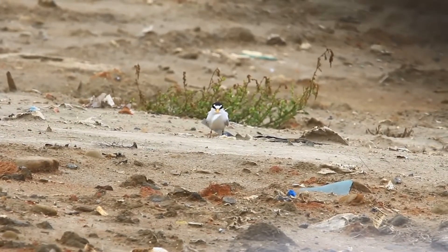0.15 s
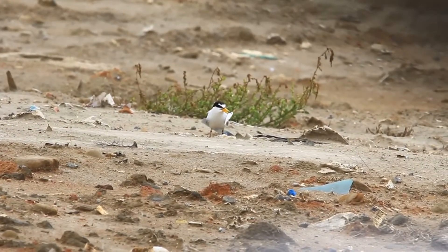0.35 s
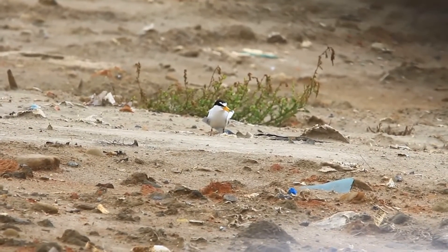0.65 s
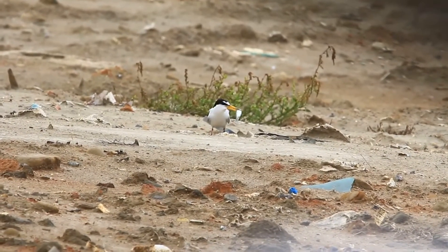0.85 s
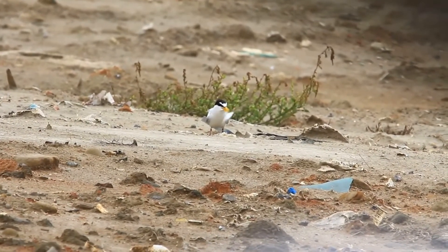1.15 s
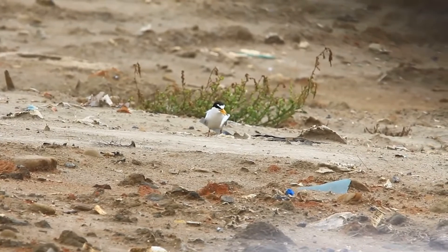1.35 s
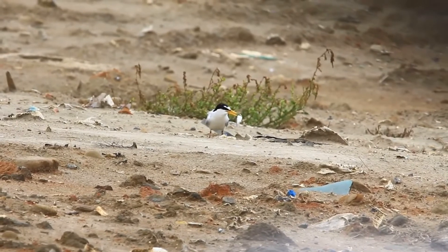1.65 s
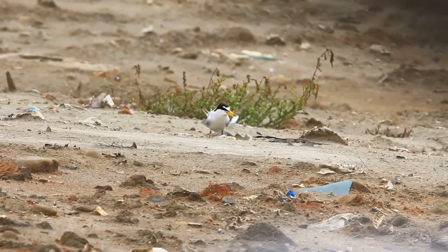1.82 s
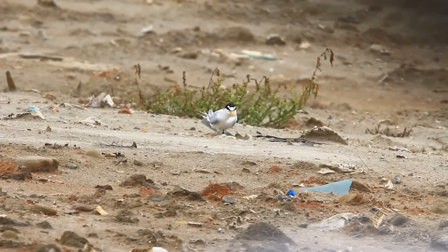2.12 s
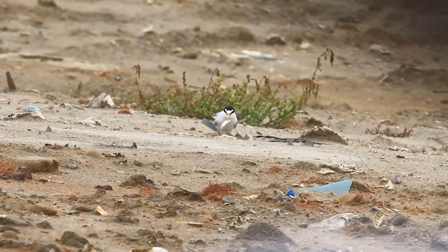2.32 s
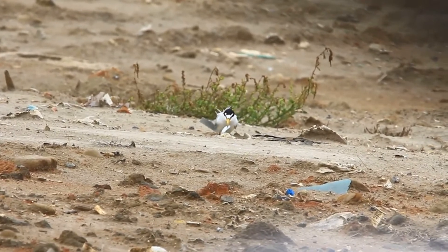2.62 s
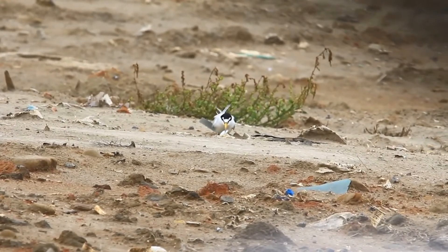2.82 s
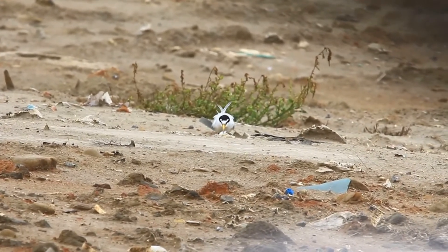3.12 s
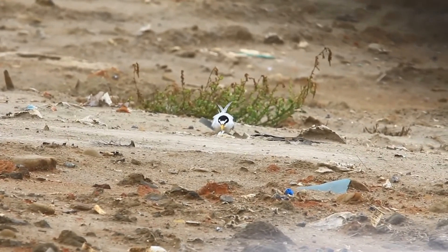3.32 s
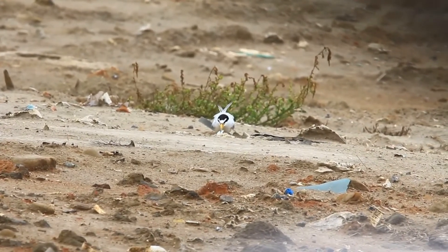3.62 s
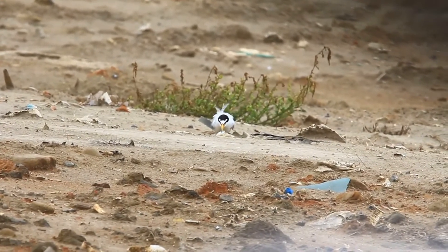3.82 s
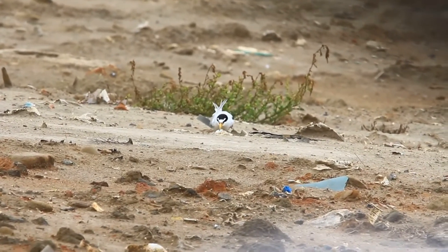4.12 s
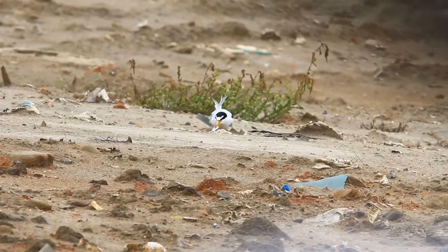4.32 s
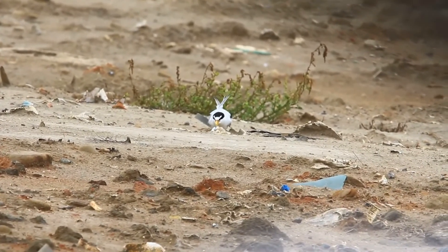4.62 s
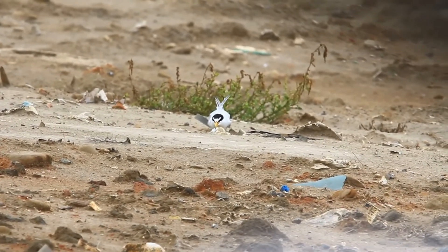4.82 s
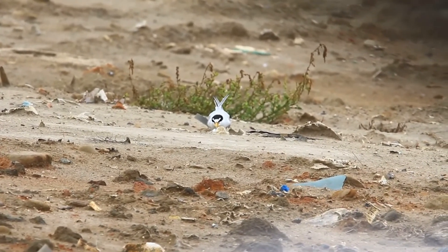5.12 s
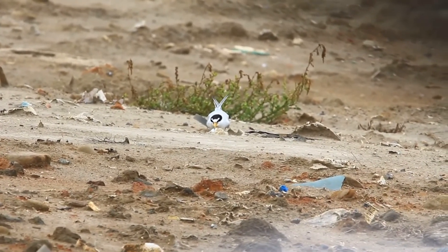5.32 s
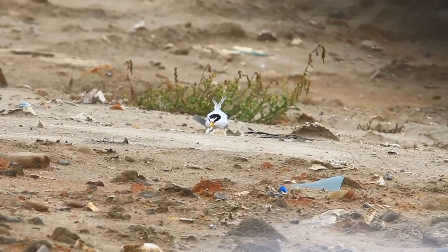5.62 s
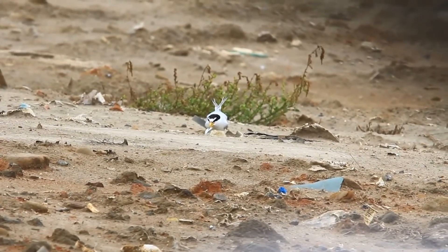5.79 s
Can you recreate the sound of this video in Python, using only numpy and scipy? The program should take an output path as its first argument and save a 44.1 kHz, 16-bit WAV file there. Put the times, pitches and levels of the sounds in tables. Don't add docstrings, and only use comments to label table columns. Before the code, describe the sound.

On an open shore, small seabirds near a stereo microphone utter quick, squeaky, scratchy calls, each barely a tenth of a second, nearly centred and dry. Far-off waders peep weakly over low surf hiss, distant drone and light wind rumble. The calls thin and sink away after about three seconds, then after a near-silent dip, softer single whistled calls appear well apart.

```python
import sys
import numpy as np
from scipy import signal
from scipy.io import wavfile

SR = 44100
rng = np.random.default_rng(int(sys.argv[2]) if len(sys.argv) > 2 else 0)


def makeup_ratio(level_db):
    decades = np.asarray(level_db, float) / 20
    return 10 ** decades


def wav_out(sig):
    wavfile.write(sys.argv[1], SR, np.round(np.clip(np.atleast_2d(sig).T, -1, 1) * 32767).astype(np.int16))


N = 262395
T = np.arange(N) / SR
CUT_S = 4.162


def by_scene(first, second):
    return np.where(T < CUT_S, first, second)


def in_time(rows, t):
    s, *columns = np.transpose(rows)
    return [np.interp(t, s, c) for c in columns]


def at_hz(points, hz):
    point_hz, value = np.transpose(points)
    return np.interp(np.log(hz), np.log(point_hz), value)


def rms_one(x):
    return x / np.sqrt(np.mean(x ** 2) + 1e-20)


def band(x, low_hz, high_hz, order):
    return signal.sosfilt(signal.butter(order, [low_hz, high_hz], "band", fs=SR, output="sos"), x + 1e-18)


def drift(rate_hz, size=N):
    r = np.exp(-2 * np.pi * rate_hz / SR)
    run_in = int(SR / rate_hz)
    white = rng.standard_normal(size + run_in)
    return rms_one(signal.lfilter([1], [1, -2 * r, r * r], white)[run_in:])


def turns(hz):
    return 2 * np.pi * np.cumsum(hz) / SR


def wobbly(phase, rough, rate_hz):
    rough = np.clip(rough, 0, 1)
    swell = makeup_ratio(2.5 * rough * np.clip(drift(rate_hz, size=len(phase)), -3, 1))
    return np.sqrt(2) * swell * np.cos(phase + 1.8 * rough * drift(rate_hz, size=len(phase)))


def lines_sum(sines, gains):
    return sum(s * g for s, g in zip(sines, gains)) / np.sqrt(sum(g ** 2 for g in gains))


def banded_noise(spectra, low_hz, count, patchy_db):
    # (frequency [Hz], likeness [0-1])
    likeness = [(25, 0.94), (60, .9), (150, .76), (400, 0.85), (700, .85), (1100, .99), (2400, 1),
                (6000, 0.96), (15000, .87)]
    out = [0] * len(spectra)
    edges = low_hz * 2 ** (np.arange(count + 1) / 3)
    white = rng.standard_normal((2, 2, N))
    together = drift(0.95)
    for k, (low, high) in enumerate(zip(edges, edges[1:])):
        sos = signal.butter(3, [low, high], "band", fs=SR, output="sos")
        mid, side = signal.sosfilt(sos, white[k % 2])
        hz = np.sqrt(low * high)
        alike = np.clip(at_hz(likeness, hz), -1, 1)
        part = np.sqrt(1 + alike) * mid + np.sqrt(1 - alike) * side * [[1], [-1]]
        part = part * makeup_ratio(patchy_db * (.5 * together + drift(4.1)))
        out = [o + makeup_ratio(at_hz(s, hz)) * part for o, s in zip(out, spectra)]
    return [rms_one(o) for o in out]


def motor_whine():
    whine_hz, whine_db = 3200, -12.5
    whine = wobbly(turns(np.full(N, whine_hz)), 0.62, rate_hz=6.04)
    quarter = np.sin(turns(np.full(N, whine_hz / 4)))
    return makeup_ratio(whine_db - by_scene(0, 4)) * whine + makeup_ratio(whine_db - 9) * quarter * by_scene(0, 1)


def surf():
    # (frequency [Hz], density [dB per Hz])
    surf_spectra = [
        [(470, -58), (800, -33), (1280, -2.5), (2270, -2.5), (2440, 1), (2980, -5.5), (3210, 1), (3500, -3.5),
         (4320, -8), (6270, -22.5), (9790, -32), (11900, -26.5), (15500, -35.5)],
        [(470, -39), (800, -13), (894, -15.5), (1330, 1), (1730, -1.5), (1950, 10.5), (2270, -3.5), (2440, -6),
         (3330, -1.5), (5530, -17.5), (7640, -19.5), (14700, -16), (15500, -21)],
    ]
    first, second = banded_noise(surf_spectra, 796.6, count=13, patchy_db=1.1)
    return makeup_ratio(by_scene(-40.5, -64)) * (by_scene(first, second) + motor_whine())


def drone():
    # (frequency [Hz], density [dB per Hz])
    drone_spectrum = [(230, -5), (450, -4.5), (900, -5.5)]
    eased_sag_db_per_s = 1.1
    level_db = by_scene(-76, -80.5) + eased_sag_db_per_s * T * by_scene(1, 0)
    return makeup_ratio(level_db) * banded_noise([drone_spectrum], 230, count=6, patchy_db=1.0)[0]


def wind():
    # (frequency [Hz], density [dB per Hz])
    wind_spectrum = [(12, -30), (20, 10.5), (39, -7), (167, -19.5), (226, -21.5), (260, -22), (340, -49),
                     (570, -120)]
    # (time [s], extra wind [dB])
    gust_rows = [(0, 6), (.32, 7.5), (.47, 8), (.9, 4), (1.15, 4), (1.6, 7.5), (2.3, 9.5), (2.8, 9.5),
                 (3.0, 5), (3.35, 9.5), (3.6, 9.5), (3.9, 10.5), (4.4, 12), (5.3, 6.5)]
    gust_s = .11
    level_db = by_scene(-68, -72) + sum(db * np.exp(-((T - s) / gust_s) ** 2) for s, db in gust_rows)
    lumps = makeup_ratio(2.6 * drift(35))
    return makeup_ratio(level_db) * lumps * banded_noise([wind_spectrum], 20, count=11, patchy_db=1.5)[0]


def sing(tables, voice, level_axis, edge_s):
    out = np.zeros(N + SR)
    for rows in tables:
        start, end = int((rows[0][0] - edge_s) * SR), int((rows[-1][0] + edge_s) * SR)
        t = np.arange(start, end) / SR
        controls = in_time(rows, t)
        level_db = controls.pop(level_axis)
        edge = np.clip(np.minimum(t - t[0], t[-1] - t) / (2 * edge_s), 0, 1)
        out[start:end] += voice(*controls) * makeup_ratio(level_db) * edge
    return out[:N]


def quick_rise(opened, broken, end, top_hz, db):
    opening_s, voiced_share = .0205, .38
    start_hz, climb_hz, bow_hz = 677, 301.5, 28
    start_db, voiced_db, open_db, climbed_db = -20, -13.5, -3.5, -1
    start, open_hz = opened - opening_s, top_hz - climb_hz
    voiced_hz = start_hz + voiced_share * (open_hz - start_hz)
    return [(start, start_hz, db + start_db),
            (start + voiced_share * opening_s, voiced_hz, db + voiced_db),
            (opened, open_hz, db + open_db),
            ((opened + broken) / 2, (open_hz + top_hz) / 2 + bow_hz, db + (open_db + climbed_db) / 2),
            (broken + .001, top_hz, db + climbed_db)]


def rise(hz, half_db=-60):
    # (frequency [Hz], gain [dB])
    throat_band = [(700, -48.5), (1100, -15.5), (1400, -10), (2200, -7.5), (3200, 3), (4200, 3),
                   (5500, -12.5), (6700, -29), (7400, -63.5), (9000, -69.5)]
    ring_hz, ring_width_hz = 3500, 900
    orders = np.arange(1, 33) / 2
    closed = np.clip(1 - hz / 1500, 0, 1)
    narrow = 1 + .9 * closed
    throat = [makeup_ratio(narrow * at_hz(throat_band, k * hz)) for k in orders]
    gains = [makeup_ratio(half_db) * g ** 4 if k % 1 else g for k, g in zip(orders, throat)]
    phase = turns(hz * (1 + 0.006 * drift(140, size=len(hz))))
    lags = [2.0 * np.arctan((k * hz - ring_hz) / ring_width_hz) for k in orders]
    sines = [wobbly(k * phase - lag, .08 + .17 * closed, rate_hz=250) for k, lag in zip(orders, lags)]
    return lines_sum(sines, gains)


def rasp_end(opened, entry, end, top_hz, db):
    entry_hz, held_hz, peak_hz, end_hz = 1971, 2117, 2227, 1710
    entry_db, held_db, peak_db, end_db = db - 1.5, db + 0.5, db + 2, db - 17.5
    entry_rough, held_rough, end_rough = .75, .47, .9
    high_hz, high_db = top_hz + 1778, 0.5
    high_end_hz = high_hz - 114
    settled, peak = entry + .008, entry + .6 * (end - entry)
    rows = [(entry, entry_hz, 2 * top_hz, entry_db, high_db, entry_rough),
            (settled, held_hz, high_hz, held_db, high_db, held_rough),
            ((settled + peak) / 2, held_hz, high_hz, held_db, high_db, held_rough),
            (peak, peak_hz, high_hz, peak_db, high_db - 1, held_rough),
            (end - .011, held_hz, high_end_hz, held_db, high_db, held_rough),
            (end, end_hz, high_end_hz, end_db, high_db, end_rough)]
    wander = [0, 35, 100, 0, 3, 0]
    return rows + rng.standard_normal(np.shape(rows)) * wander


def hoarse(size, low_hz, high_hz):
    return rms_one(band(rng.standard_normal(size), low_hz, high_hz, order=2))


def rasp(low_hz, high_hz, high_db, rough):
    # (multiple of low voice, multiple of high voice, level [dB])
    mixing_lines = [(1, 0, -7), (2, 0, 3), (3, 0, -31.5), (0, 1, 1), (1, 1, -13), (-1, 1, -16.5),
                    (-2, 2, -18.5), (-1, 2, -5.5), (5, -2, -11)]
    size = len(rough)
    low = turns(low_hz * (1 + 0.013 * rough * drift(220, size=size)))
    high = turns(high_hz * (1 + 0.044 * rough * drift(120, size=size)))
    sines = [wobbly(m * low + n * high, rough * (.95 if n else .4), rate_hz=300) for m, n, db in mixing_lines]
    gains = [makeup_ratio(db + high_db * (n != 0)) for m, n, db in mixing_lines]
    voices = lines_sum(sines, gains) + .4 * rough * hoarse(size, 3400, 4874)
    voices = 2.015 * np.tanh(voices / 1.31)
    faint_noise = rng.standard_normal(size)
    return makeup_ratio(-0.84) * band(voices, 1206, 6110, order=5) + makeup_ratio(-43.5) * faint_noise


def wind_up(start, broken, locked, top_hz, db):
    # (share of its length, pitch [Hz], level against the call's [dB])
    glides = [
        [(0, 468.7, -22.5), (.2, 610, -16.5), (.74, 823, -14), (.9, 1162, -13), (1, 1500, -6.5)],
        [(0, 481, -18.5), (.26, 610, -15), (.55, 770, -14.5), (.72, 934, -7), (.84, 1230, -8), (1, 1450, -5.5)],
    ]
    glide = glides[int(start > CUT_S)]
    return [(start + share * (broken - start), hz, db + gain_db) for share, hz, gain_db in glide]


def whistle_end(start, broken, locked, top_hz, db):
    slip_hz, lock_hz, sag_hz, end_hz = 1800, 1770, 110, 1530
    slip_rough, lock_rough, sag_rough, end_rough = .52, .04, .4, .9
    slip_half_db, end_half_db = -13, -5
    climb_s, hold_s, sag_s, release_s = .021, .006, .004, .011
    swell_hz = top_hz - lock_hz
    low_db, half_db = db - .024 * swell_hz, -20 - .16 * swell_hz
    slip_db, hold_db = low_db + 0.5, db - .6
    top = locked + climb_s
    sag = top + hold_s + sag_s
    return [(broken, slip_hz, slip_db, slip_rough, slip_half_db),
            (locked - .001, slip_hz, slip_db, slip_rough, slip_half_db),
            (locked + .001, lock_hz, low_db, lock_rough, half_db),
            (top - hold_s, top_hz, hold_db, lock_rough, half_db),
            (top, top_hz, db, lock_rough, half_db),
            (top + hold_s, top_hz - sag_hz / 3, hold_db, lock_rough, half_db),
            (sag, top_hz - sag_hz, db - 4, sag_rough, slip_half_db),
            (sag + release_s, end_hz, db - 20, end_rough, end_half_db)]


def whistle(hz, rough, half_db):
    # (multiple of the pitch, level [dB])
    partial_lines = [(1, -18.5), (1.5, 0), (2, 3.5), (2.5, 3.5), (3, -27), (4, -33.5)]
    size = len(hz)
    phase = turns(hz * (1 + 0.0308 * rough * drift(200, size=size)))
    gains = [makeup_ratio(db + (half_db if k % 1 else 0 * hz)) for k, db in partial_lines]
    sines = [wobbly(k * phase, .02 * k + .4 * rough, rate_hz=300) for k, db in partial_lines]
    slips = (.5 + .5 * np.cos(turns(300 * (1 + .35 * drift(60, size=size))))) ** 2
    stutter = 1 - np.clip(1.3 * rough, 0, 1) * slips
    voice = stutter * lines_sum(sines, gains) + 0.067 * rough * hoarse(size, 2700, 4700)
    return makeup_ratio(2.86) * band(voice, 1310, 6300, order=4)


def slow_rise(jump, broken, end, top_hz, db):
    opening_s, voiced_share = .039, .17
    start_hz, voiced_hz, open_hz, climb_hz = 520, 630, 1172, 220
    start_db, voiced_db, open_db, climbed_db = db - 27.5, db - 13.5, db - 3.5, db - 2.5
    even_db, paired_db = -40, -18
    start = jump - opening_s
    return [(start, start_hz, start_db, even_db),
            (start + voiced_share * opening_s, voiced_hz, voiced_db, even_db),
            (jump - .001, open_hz, open_db, even_db),
            (jump + .001, top_hz - climb_hz, open_db, paired_db),
            (broken + .001, top_hz, climbed_db, paired_db)]


def tern_calls():
    # (beak open [s], voice breaks [s], end [s], top pitch [Hz], level [dB])
    quick_calls = [
        (0.196, .229, .272, 1706, -14),
        (.591, .621, .671, 1693, -15),
        (1.038, 1.061, 1.119, 1628, -15),
        (2.178, 2.217, 2.257, 1632, -15),
    ]
    # (register jump [s], voice breaks [s], end [s], top pitch [Hz], level [dB])
    slow_calls = [
        (0.8577, .884, .931, 1568, -15.5),
        (1.48, 1.51, 1.554, 1579, -14.5),
        (2.688, 2.72, 2.759, 1578, -15.5),
    ]
    # (start [s], voice breaks [s], locks [s], top pitch [Hz], level [dB])
    whistled_calls = [
        (0.315, .362, .365, 1921, -9),
        (4.407, 4.452, 4.464, 1822, -19.5),
        (5.094, 5.145, 5.16, 1798, -21.5),
        (5.946, 5.996, 6.01, 1810, -18.5),
    ]
    rises = [quick_rise(*c) for c in quick_calls] + [slow_rise(*c) for c in slow_calls]
    rises = rises + [wind_up(*c) for c in whistled_calls]
    rasps = [rasp_end(*c) for c in quick_calls + slow_calls]
    whistles = [whistle_end(*c) for c in whistled_calls]
    terns = sing(rises, rise, level_axis=1, edge_s=.002)
    terns = terns + sing(rasps, rasp, level_axis=2, edge_s=.002)
    terns = terns + sing(whistles, whistle, level_axis=1, edge_s=.001)
    no_bass = signal.butter(4, 950, "high", fs=SR, output="sos")
    return signal.sosfilt(no_bass, terns + 1e-18)


def echoes(x):
    # (delay [s], level [dB])
    returns = [
        (0.01, -38),
        (.045, -51.5),
        (.118, -39),
    ]
    out = np.zeros((2, N))
    dull = signal.lfilter([.6], [1, -.4], x)
    for delay_s, db in returns:
        for ear in (0, 1):
            lag = int(delay_s * SR) + 9 * ear
            out[ear, lag:] += makeup_ratio(db) * dull[:-lag]
    return out


def puffs():
    # (time [s], level [dB])
    puff_rows = [
        (.245, -65.5),
        (.645, -64),
        (.9, -62),
        (1.525, -61),
        (2.724, -51.5),
        (2.738, -49),
        (4.47, -70.5),
    ]
    shape = sum(makeup_ratio(db) * np.exp(-((T - s) / 0.013) ** 2) for s, db in puff_rows)
    white = rng.standard_normal(N)
    return shape * (band(white, 7500, 15500, order=2) + 2.2 * band(white, 150, 900, order=1))


def falling(start, length, from_hz, to_hz, db):
    hold_share, fall_share, loss_db = 0.26, .6, -2.5
    return [(start, from_hz, db + loss_db), (start + hold_share * length, from_hz, db),
            (start + fall_share * length, to_hz, db), (start + length, to_hz, db + loss_db)]


def arched(start, length, hz, glide_hz, db):
    arch_hz, peak_share, start_db, end_db = 110, .55, -10, -15
    return [(start, hz - glide_hz / 2, db + start_db), (start + peak_share * length, hz + arch_hz, db),
            (start + length, hz + glide_hz / 2, db + end_db)]


def peep(hz):
    return wobbly(turns(hz), 0.21, rate_hz=340)


def far_shorebirds():
    # (start [s], length [s], from [Hz], to [Hz], level [dB])
    fall_rows = [
        (0.357, 0.036, 3155, 2349, -26),
        (1.002, .057, 3070, 2290, -28.5),
    ]
    # (start [s], length [s], pitch [Hz], glide [Hz], level [dB])
    peep_rows = [(1.721, 0.0097, 1280, -84, -33), (1.72, 0.0073, 2430, -200, -30),
                 (1.728, 0.029, 2305, 379, -26), (1.741, 0.032, 2372, -200, -26.5),
                 (2.11, 0.016, 1230, 407, -37), (2.125, 0.04, 2345, 66, -34),
                 (2.504, 0.032, 2480, 256, -35.5), (2.911, 0.016, 2376, -4, -33),
                 (3.288, 0.039, 2370, 60, -33), (3.439, 0.09, 2300, 58.5, -49),
                 (5.643, 0.042, 2300, 380.5, -63)]
    notes = [arched(*p) for p in peep_rows] + [falling(*f) for f in fall_rows]
    return band(sing(notes, peep, level_axis=1, edge_s=0.003), 950, 4500, order=3)


def bumps():
    # (time [s], peak level [dB])
    knocks = [
        (4.549, -56.5),
        (5.239, -58),
    ]
    out, t = np.zeros(N), np.arange(4000) / SR
    for s, db in knocks:
        thud = band(rng.standard_normal(len(t)), 50, 172, order=2) * np.exp(-t / 0.019)
        start = int(s * SR)
        out[start:start + len(t)] += makeup_ratio(db) * thud / abs(thud).max()
    return out


def fader():
    fade_out_s, fade_in_s = 1.55, 0.86
    sag_from_s, sag_db_per_s = 0.86, -2.13
    share = np.clip(by_scene((CUT_S - T) / fade_out_s, (T - CUT_S) / fade_in_s), 0, 1)
    sag_db = sag_db_per_s * np.maximum(T - sag_from_s, 0) * by_scene(1, 0)
    return makeup_ratio(sag_db) * np.sin(np.pi / 2 * share) ** 2


def scene():
    shore = surf() + drone() + wind() + puffs() + bumps()
    terns = tern_calls()
    birds = terns + far_shorebirds()
    lead = .1 * np.gradient(birds) * [[1], [-1]]
    return fader() * (birds * makeup_ratio([[.15], [-.15]]) + lead + echoes(terns) + shore)


def low_pass(x):
    return signal.sosfilt(signal.butter(12, 15640, fs=SR, output="sos"), x)


def record(dry):
    top = 1.8
    mix = top * np.tanh(dry / top)
    return low_pass(mix)


dry = scene()
out = record(dry)
wav_out(out)
```